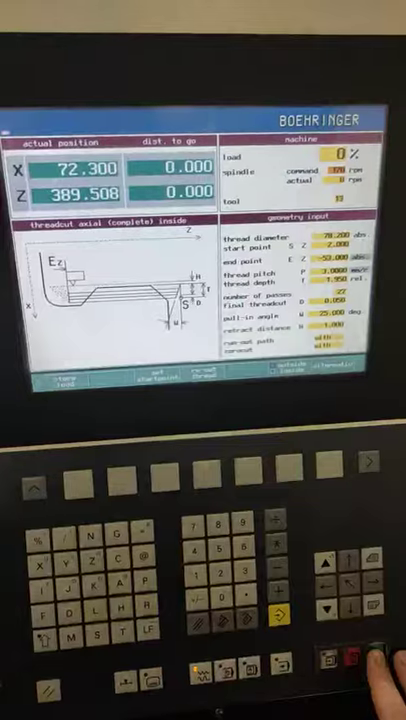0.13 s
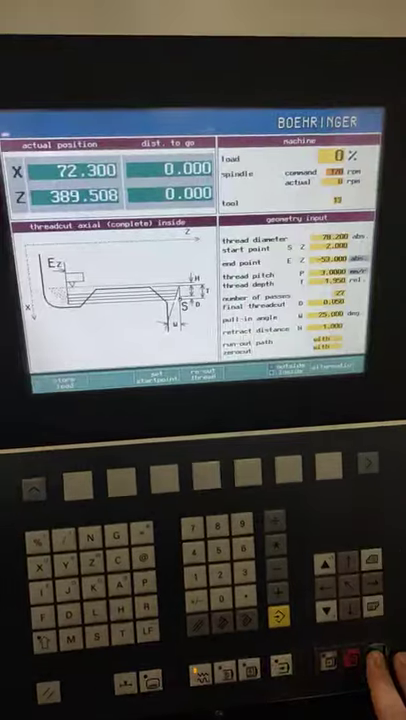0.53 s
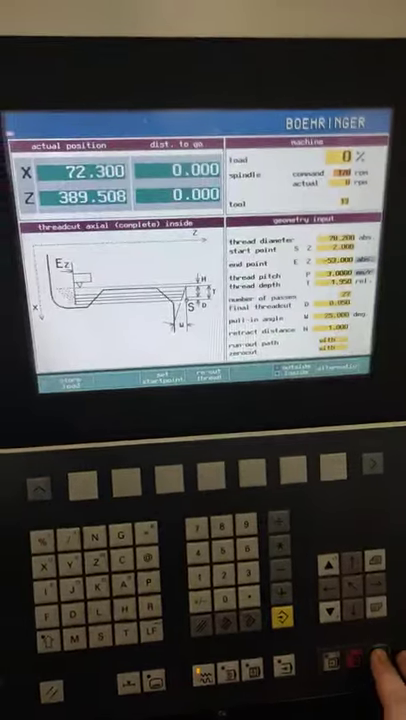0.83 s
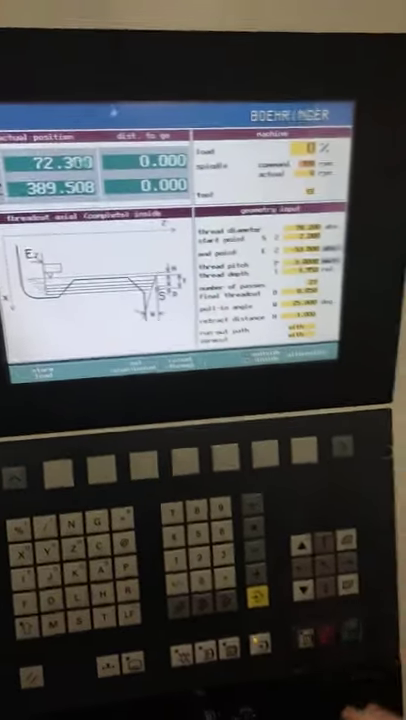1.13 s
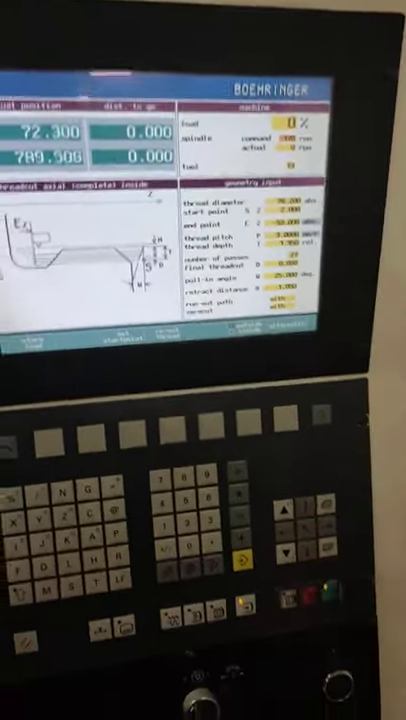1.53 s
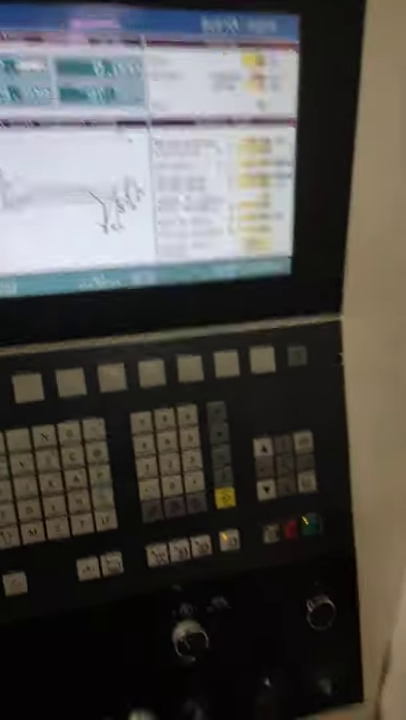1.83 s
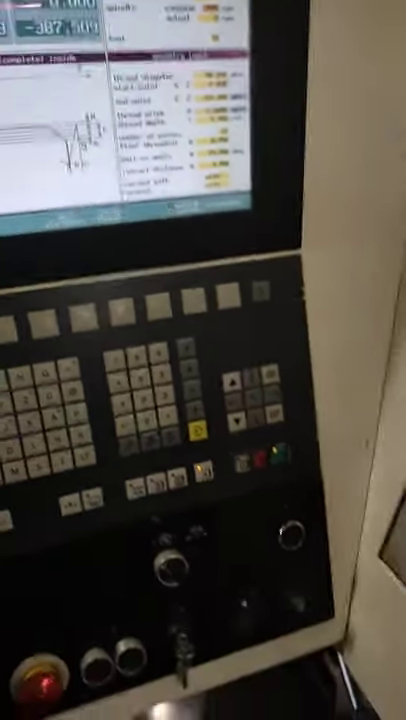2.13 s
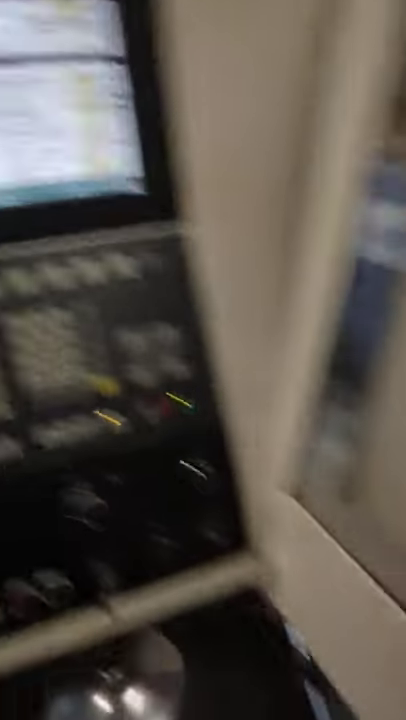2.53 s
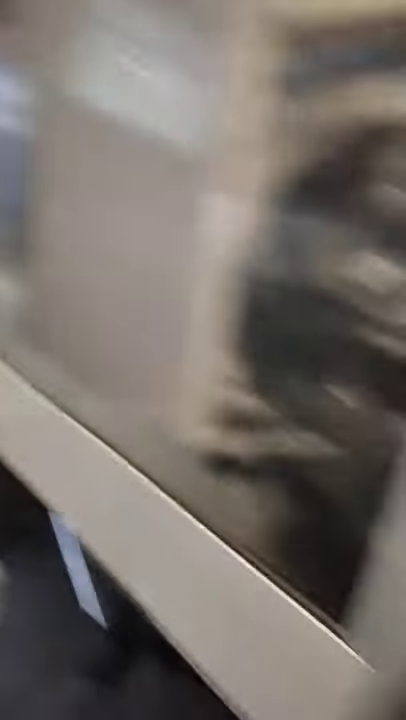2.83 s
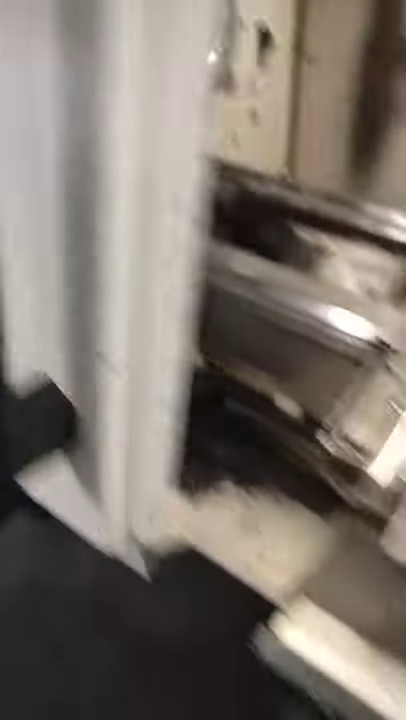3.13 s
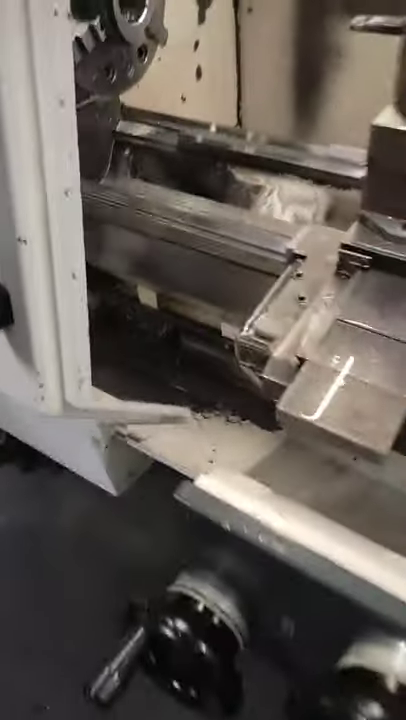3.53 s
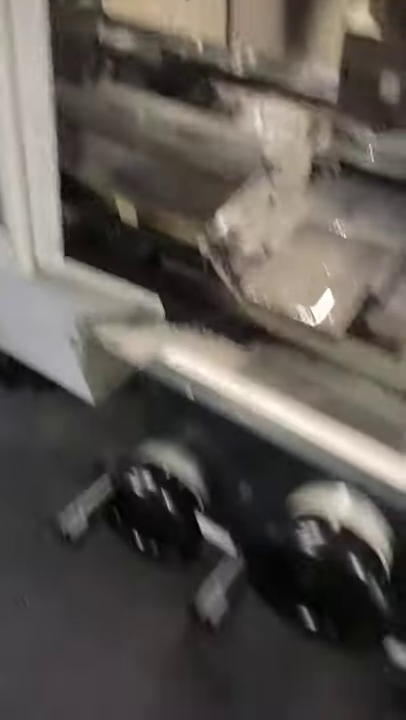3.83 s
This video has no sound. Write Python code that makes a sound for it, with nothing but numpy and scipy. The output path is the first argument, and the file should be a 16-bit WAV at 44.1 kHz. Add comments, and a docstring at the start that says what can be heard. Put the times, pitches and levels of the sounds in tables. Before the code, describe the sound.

A lathe's cooling fans cut in abruptly at about 0.35 seconds, rushing steadily with a wavering high whine over a low motor hum. From 0.6 to 2.3 seconds the drives rumble and give short, rough groans, strongest near 0.6 and 1.9. From about 2.5 seconds, as the microphone nears the open work area, a hiss and hollow roar grow unevenly, peaking just before the end at 4 seconds.

```python
"""The cooling fans of a powered CNC lathe, rushing and whining over the hum of its motors in a workshop.
The stereo microphone starts at the control panel and is carried to the open work area.
The axis drives rumble and groan briefly as the slide moves; near the open door a hiss and a
hollow roar grow. The sound cuts in abruptly, through a compressor."""
import sys
import numpy as np
from scipy import signal
from scipy.fft import rfft, irfft, next_fast_len
from scipy.io import wavfile
from scipy.ndimage import uniform_filter1d, map_coordinates

SR = 44100
rng = np.random.default_rng(int(sys.argv[2]) if len(sys.argv) > 2 else 0)


def master(y):
    """Save y as 16-bit WAV."""
    cut = np.clip(np.atleast_2d(y).T, -1, 1)
    pcm = np.round(cut * 32767)  # scale
    wavfile.write(sys.argv[1], SR, pcm.astype(np.int16))


N = 176400

# Spectra of the fan air, the work area's hiss, the fine sizzle above it, the roar in the enclosure
# and the drives' rumble. Each row: frequency in Hz, relative level in dB.
FAN_SPECTRUM = [(25, -78), (70, -66), (84, -53), (100, -50), (200, -43), (300, -47.5), (450, -47),
                (600, -50), (750, -56), (1000, -50.5), (1450, -53), (2200, -54.5), (2800, -58.5),
                (3600, -63.5), (4700, -68.5), (5700, -73.5), (6700, -73), (8000, -67.5), (8700, -82),
                (12000, -77), (15000, -84)]
HISS_SPECTRUM = [(1000, -67), (2600, -54), (3700, -57.5), (4800, -59.5), (5500, -64), (6600, -59.5),
                 (7500, -64), (9300, -69.5), (12000, -80), (15000, -82)]
SIZZLE_SPECTRUM = [(6000, -79), (9000, -86), (10000, -71), (12000, -68.5), (15000, -74)]
ROAR_SPECTRUM = [(100, -106), (200, -44.5), (290, -42), (400, -45), (540, -62), (790, -58.5), (1000, -67),
                 (2000, -87)]
RUMBLE_SPECTRUM = [(60, -90), (85, -64), (102, -40), (125, -45.5), (190, -47.5), (260, -54.5), (500, -88)]
# The walk to the door. Each row: time in seconds, then gains of hiss, sizzle and roar in dB.
WALK_TO_DOOR = [(.35, -11, -13, -2), (.8, -12, -14, -3.5), (1.2, -19, -13, -27), (1.75, -14, -14, -5),
                (2.05, -18, -13, 4), (2.55, -7, -8, -8.5), (2.9, -5.5, -5.5, -2), (3.35, -7, -2, -3.5),
                (3.65, -7.5, -3, 2.5), (3.73, -2.5, 1, -4.5), (3.86, 2, 0, 5.5), (4, -3.5, -1.5, -0.5)]
# Rise and fall of the rumble. Each row: time in seconds, gain in dB.
RUMBLE_GAINS = [(.35, 2.5), (.57, -5), (.64, 3.5), (.88, 2), (1.05, -7), (1.3, -2), (1.6, 0), (1.88, 2),
                (2.02, 1), (2.3, -3), (2.6, -8), (4, -24)]
# Likeness of the noise left and right. Each row: frequency in Hz, coherence.
COHERENCE = [(100, 0.97), (180, 0.98), (280, 0.81), (500, 0.53), (900, 0.086), (2000, -0.07),
             (8000, -0.0025)]
# Colour of the two microphone ports. Each row: frequency in Hz, left and right gain in dB.
MIC_COLOUR = [(152, -1.5, -2.5), (450, -1.5, 1.4), (665, 3, 1), (1350, -1.5, 1), (2200, -3, 2.5),
              (3670, -1, -0.5), (5200, 1.5, 2), (5800, 0, 0), (6700, -1, 1.5), (7150, -7, 0),
              (7700, -6, 1.5), (8300, -5.5, -1), (9000, 1, 1), (9600, 4, 2), (10200, 6, 0), (11400, 10, -4),
              (11750, 14.5, 1), (12400, 15, 1), (13700, 13.5, -1), (14800, 11, 0), (15400, 7, -12)]
# Motor hum. Each row: frequency in Hz, relative level in dB.
HUM_LINES = [(48.4, -45), (101, -35.5), (144.3, -30.5), (184.6, -33), (297, -42), (398, -33.5)]
# Whines of fans and drives. Each row: frequency in Hz, left and right relative level in dB.
WHINE_LINES = [(798, -43, -43), (1060, -41, -41), (1268, -45, -42), (1585, -47, -41), (1600, -44, -38),
               (1745, -44, -41), (1885, -48, -45.5), (1998, -44, -40), (2046.5, -43, -38.5),
               (4560, -57, -54), (7930, -56.5, -50), (8000, -55, -49), (8071, -55.5, -49.5),
               (10142, -56, -63)]
# Axis drive groans. Each row: start and length in seconds, first and last pitch in Hz, level in dB.
DRIVE_GROANS = [(.595, .05, 235, 195, -15), (.645, .07, 160, 130, -14.5), (.76, .05, 192, 200, -19),
                (.835, .06, 110, 102, -22.5), (1.145, .04, 198, 205, -22.5), (1.72, .075, 110, 110, -23),
                (1.8, .06, 138, 146, -18.5), (1.865, .04, 114, 106, -20), (1.893, .08, 176, 194, -10.5),
                (1.99, .035, 200, 212, -20), (2.195, .075, 186, 180, -16.5), (2.28, .08, 146, 142, -24),
                (2.6, .085, 1170, 1020, -27), (2.92, .2, 1000, 1000, -33.5)]
# Swells of hiss. Each row: peak time and length in seconds, centre and width in Hz, level in dB.
HISS_SWELLS = [(2.545, .085, 4970, 330, -35), (2.55, .1, 9800, 340, -36.5), (3.82, .16, 4450, 380, -31)]
# The upper fan note between the ports. Each row: time in seconds, lead of the left in radians.
UPPER_NOTE_LEAD = [(.8, 1.8), (1.5, .6), (2.3, .8), (2.65, 2.3), (3.4, 1.8)]
# Fan notes at the microphone. Each row: time in seconds, then levels in dB of the upper note
# left and right and of the lower note left and right.
FAN_NOTE_LEVELS = [(.35, -33, -26.5, -29, -34), (.55, -33, -26.5, -28.5, -36), (.72, -32, -31, -28, -38),
                   (1.05, -34, -26, -29.5, -36), (1.5, -32.5, -25.5, -29.5, -35.5),
                   (1.85, -29, -25, -31, -38), (1.98, -35, -33, -36, -38), (2.08, -26, -25, -34, -39),
                   (2.36, -25.5, -27.5, -36, -40), (2.55, -31, -30, -35, -35), (2.68, -38, -29, -36, -34),
                   (2.85, -28.5, -28, -39, -41), (3.05, -36, -33, -44, -42), (3.3, -29.5, -28, -38, -38),
                   (3.42, -29.5, -31, -31, -32), (3.75, -28.5, -32.5, -34, -35), (4, -34, -33, -41, -38)]


def amp(db):
    """Decibels to gain."""
    return 10 ** (np.asarray(db) / 20)


def along(points, hz, column=1):
    """One column of a table, read on a log frequency axis."""
    table = np.transpose(points)
    return np.interp(np.log(hz + 1), np.log(table[0] + 1), table[column])


def curves(rows):
    """One value per sample for each column after the time."""
    times, *columns = np.transpose(rows)
    return [np.interp(np.arange(N) / SR, times, column) for column in columns]


def wobble(rate):
    """A smooth random curve, rate knots a second."""
    return map_coordinates(rng.standard_normal(2048), [np.arange(N) * rate / SR], mode="wrap")


def filtered(x, response):
    """x through a filter whose gain is response(hz)."""
    size = next_fast_len(N + SR // 2)
    return irfft(rfft(x, size) * response(np.fft.rfftfreq(size, 1 / SR)), size)[..., :N]


def rush(spectrum, patchy_db):
    """Stereo air noise with patches of turbulence, near mono in the bass."""
    def mid_side_gains(hz):
        spread = np.arccos(np.clip(along(COHERENCE, hz), -1, 1)) / 2
        return amp(along(spectrum, hz)) * np.array([np.cos(spread), np.sin(spread)])

    cells = signal.stft(rng.standard_normal((2, N)), nperseg=512)[2]
    patches = uniform_filter1d(rng.standard_normal(cells.shape[1:]), size=6, axis=0)
    patches = uniform_filter1d(patches, size=12, axis=1)
    noise = signal.istft(cells * amp(patchy_db * patches / patches.std()), nperseg=512)[1][:, :N]
    mid, side = filtered(noise, mid_side_gains)
    return np.sqrt(SR / 2) * np.array([mid + side, mid - side])


def tone(hz, drift_rad, flutter_db):
    """A sine of rms near 1 whose phase and level waver."""
    phase = 2 * np.pi * (hz * np.arange(N) / SR + rng.random()) + drift_rad * wobble(5.96)
    return np.sqrt(2) * np.sin(phase) * amp(flutter_db * wobble(9))


def motor_hum(trim_db=-1):
    """The motors hum in low lines, alike on both channels."""
    return sum(amp(db + trim_db) * tone(hz, drift_rad=0.88, flutter_db=2) for hz, db in HUM_LINES)


def faint_whines(trim_db=-1):
    """Thin lines of fans and drives; reflections make them waver at each port, the high ones most."""
    out = np.zeros((2, N))
    for hz, *sides_db in WHINE_LINES:
        drift_rad = .6 + .14 * hz / 1000
        out += [amp(db + trim_db) * tone(hz, drift_rad, flutter_db=3.4) for db in sides_db]
    return out


def hiss_swells():
    """Short whistles near the door: narrow bands of noise that rise and fall."""
    out = 0
    for peak_s, length, centre_hz, width_hz, db in HISS_SWELLS:
        noise = rng.standard_normal((2, N))
        band = filtered(noise, lambda hz: np.exp(-2 * ((hz - centre_hz) / width_hz) ** 2))
        swell = np.exp(-2 * ((np.arange(N) / SR - peak_s) / length) ** 2)
        out += amp(db) * band / band.std() * swell
    return out


def work_area():
    """Hiss, sizzle and the enclosure's hollow roar grow unevenly as the microphone nears the door."""
    hiss_gain, sizzle_gain, roar_gain = amp(curves(WALK_TO_DOOR))
    hiss = hiss_gain * rush(HISS_SPECTRUM, patchy_db=2.7)
    sizzle = sizzle_gain * rush(SIZZLE_SPECTRUM, patchy_db=1.5)
    roar = roar_gain * rush(ROAR_SPECTRUM, patchy_db=1.2)
    return hiss + sizzle + roar


def axis_drives(attack_s=.012, release_s=.03, overtone_db=-14, rough_db=2.2):
    """The moving slide rumbles, and its drives groan in short, rough tones, most of them gliding."""
    out = amp(curves(RUMBLE_GAINS)) * rush(RUMBLE_SPECTRUM, patchy_db=0.9)
    for start, length, from_hz, to_hz, db in DRIVE_GROANS:
        t = np.arange(N) / SR - start
        pitch_hz = np.interp(t, [0, length], [from_hz, to_hz])
        phase = 2 * np.pi * (np.cumsum(pitch_hz) / SR + rng.random())
        groan = np.sin(phase) + amp(overtone_db) * np.sin(2 * phase)
        envelope = np.clip(t / attack_s, 0, 1) * np.clip((length - t) / release_s + .5, 0, 1)
        out += np.sqrt(2) * amp(db + rough_db * wobble(70)) * envelope * groan
    return out


def fan_notes(upper_hz=1205.5, lower_hz=1133.3, beat_hz=6.6, beat_db=-11, drift_rad=.15):
    """Two close blade notes swell and fade as the microphone moves through the room's reflections."""
    gains = amp(curves(FAN_NOTE_LEVELS))
    lead, = curves(UPPER_NOTE_LEAD)
    t = np.arange(N) / SR
    phase = 2 * np.pi * upper_hz * t + drift_rad * wobble(6.1) + np.array([lead, -lead]) / 2
    # a second, weaker fan beats against the upper note
    weaker_fan = amp(beat_db) * np.sin(phase + 2 * np.pi * (beat_hz * t + rng.random()))
    upper = np.sqrt(2) * (np.sin(phase) + weaker_fan)
    lower = tone(lower_hz, drift_rad, flutter_db=.6)
    return gains[:2] * upper + gains[2:] * lower


def fan_rush(waver_db=.25):
    """The cooling fans push out a broad, nearly steady rush of air."""
    return rush(FAN_SPECTRUM, patchy_db=0.77) * amp(waver_db * wobble(3.6))


def scene():
    """The whole lathe at the microphone, whose two ports colour the fan rush and the work area."""
    air = fan_rush() + work_area()
    air = filtered(air, lambda hz: amp([along(MIC_COLOUR, hz, column) for column in (1, 2)]))
    return air + hiss_swells() + motor_hum() + faint_whines() + fan_notes() + axis_drives()


def record(dry):
    """The recorder opens abruptly, compresses the loud moments and keeps nothing above its band limit."""
    start_s, fade_s = 0.349, 0.0071
    threshold_db, cut_per_db, sense_s = -14, 0.53, 0.027
    top_hz, edge_hz = 15750, 300
    opened = dry * np.clip((np.arange(N) / SR - start_s) / fade_s, 0, 1)
    window = signal.windows.hann(int(sense_s * SR))
    power = np.abs(signal.fftconvolve(np.mean(opened ** 2, axis=0), window / window.sum(), "same"))
    over_db = np.maximum(10 * np.log10(power + 1e-12) - threshold_db, 0)
    compressed = opened * amp(-cut_per_db * over_db)
    return filtered(compressed, lambda hz: np.clip((top_hz - hz) / edge_hz, 0, 1) ** 2)


dry = scene()
out = record(dry)
master(out)
```